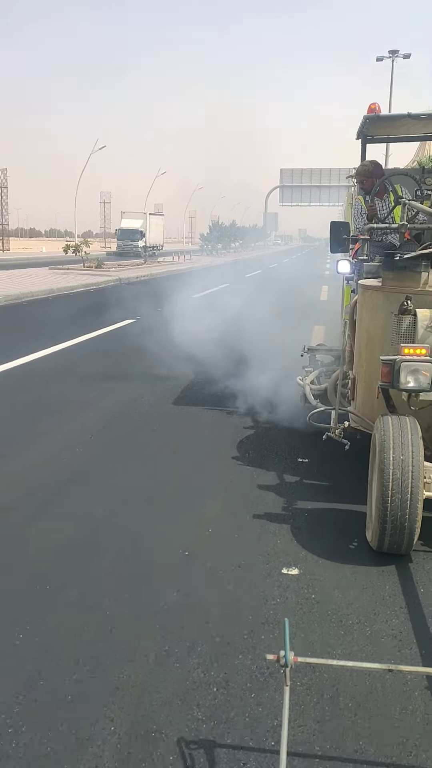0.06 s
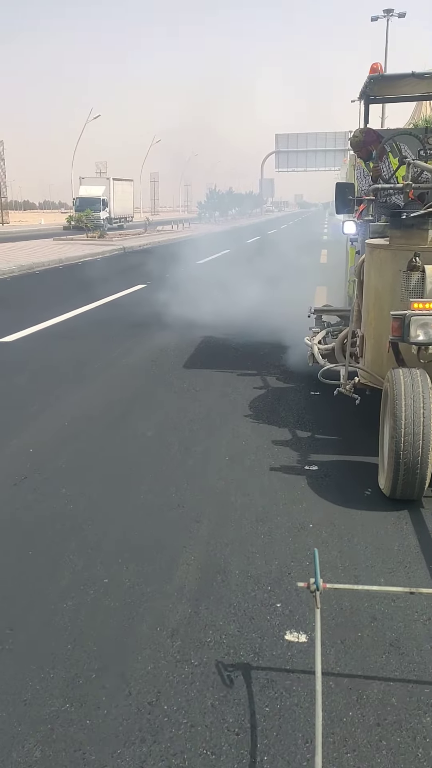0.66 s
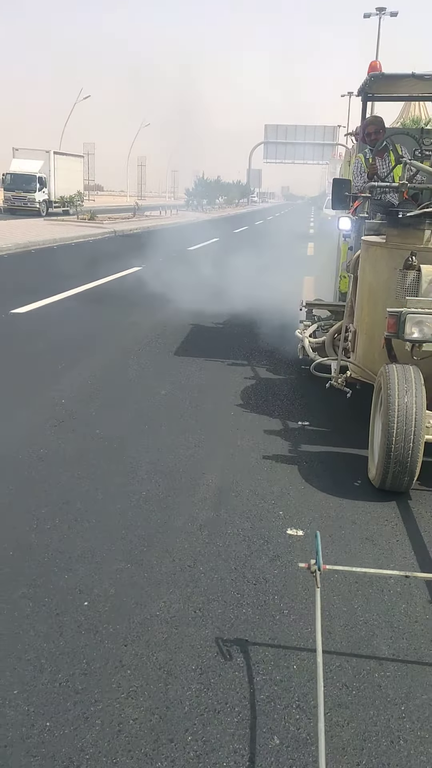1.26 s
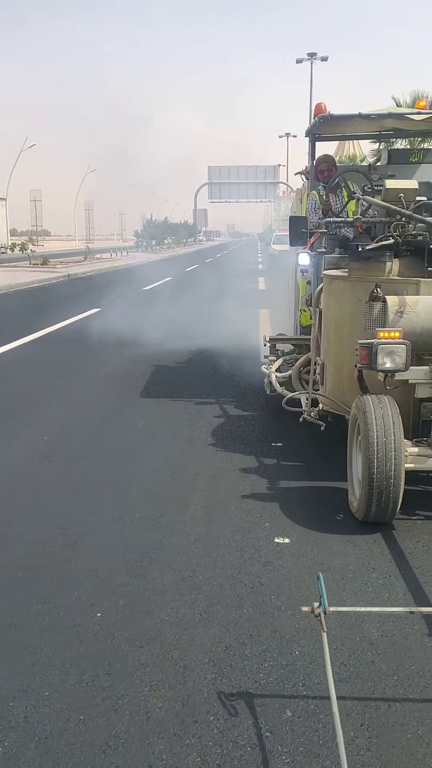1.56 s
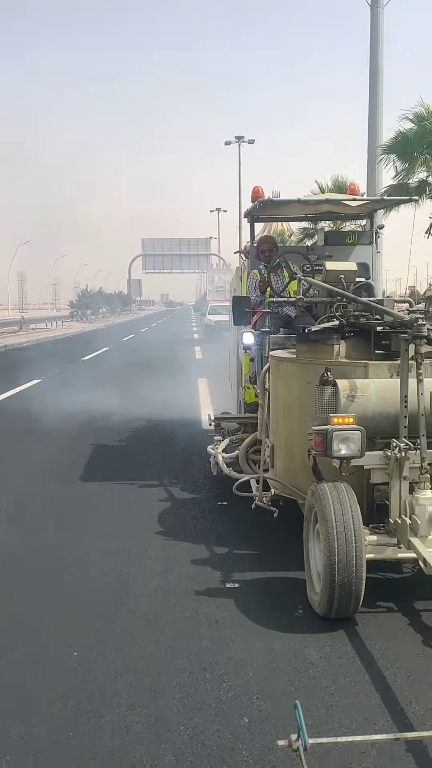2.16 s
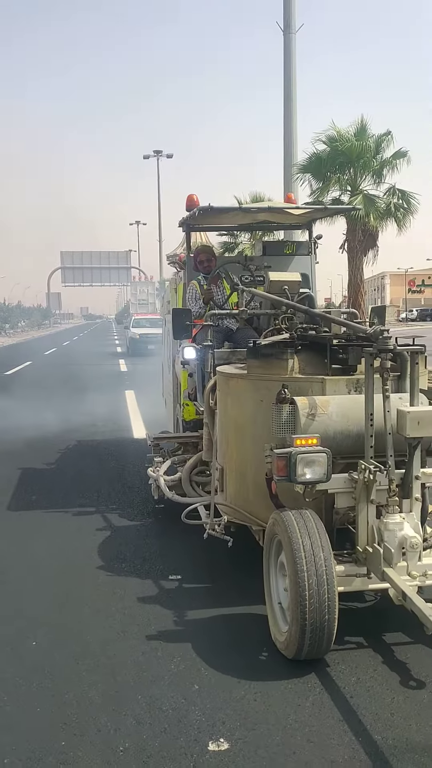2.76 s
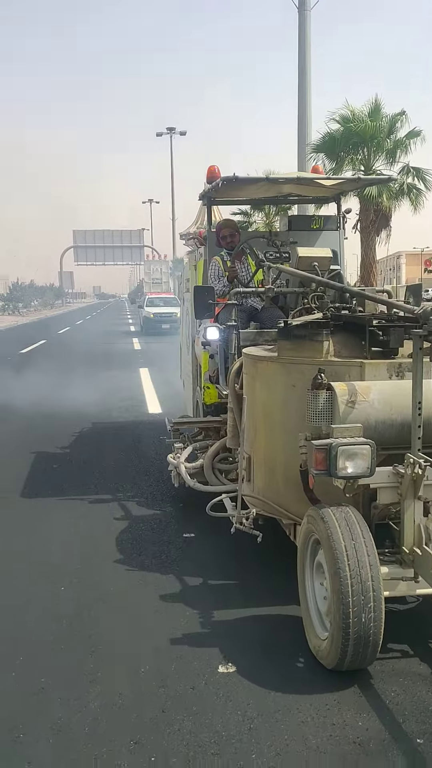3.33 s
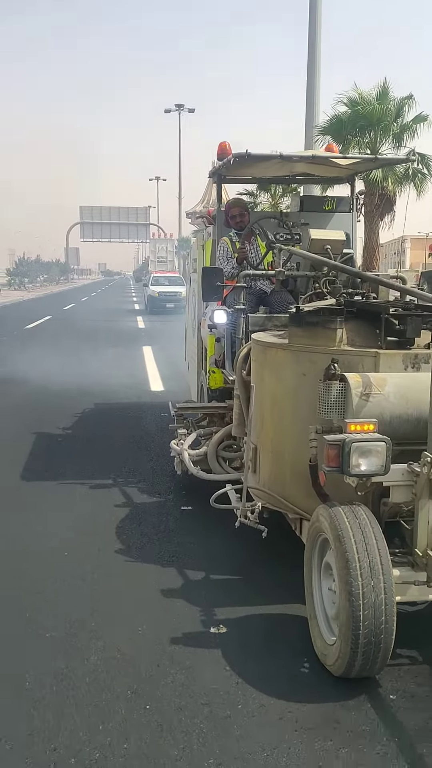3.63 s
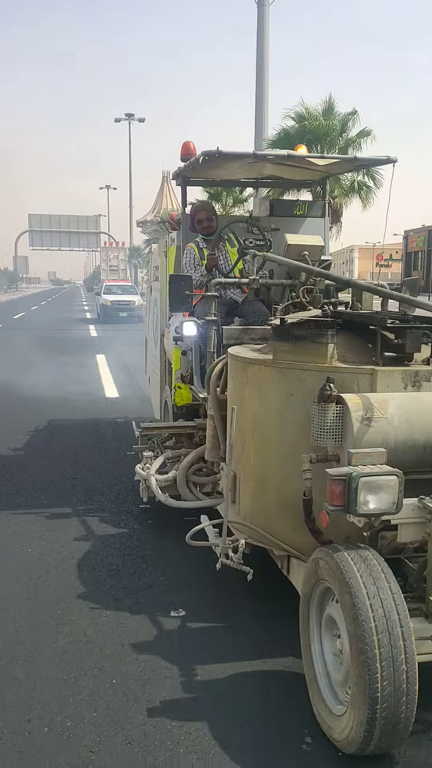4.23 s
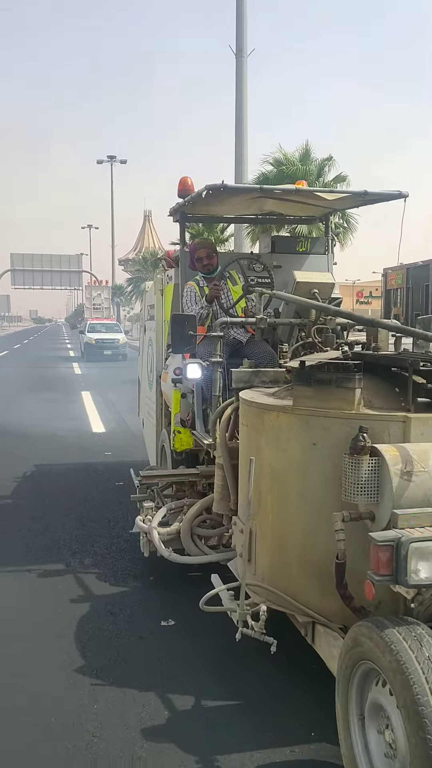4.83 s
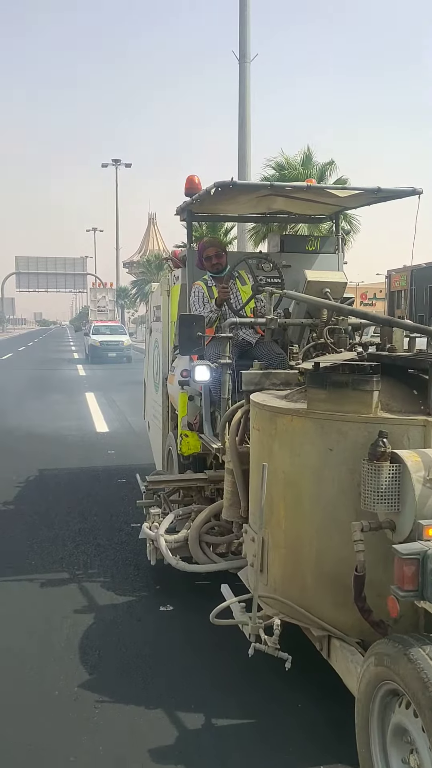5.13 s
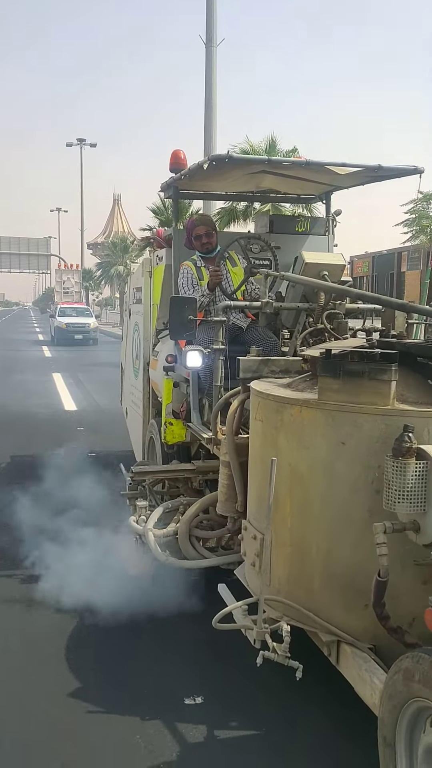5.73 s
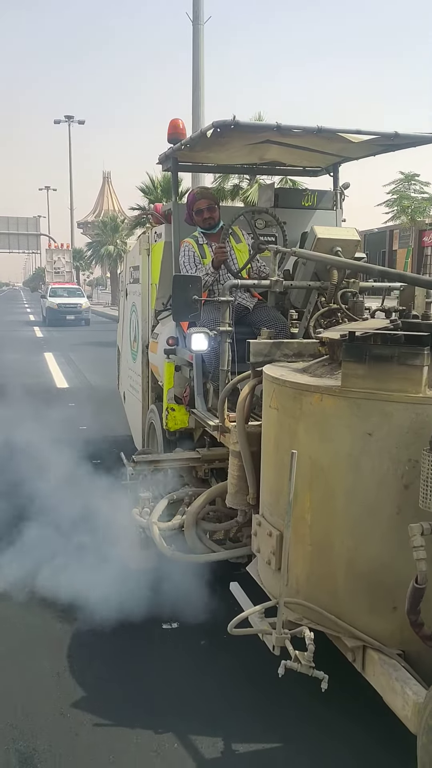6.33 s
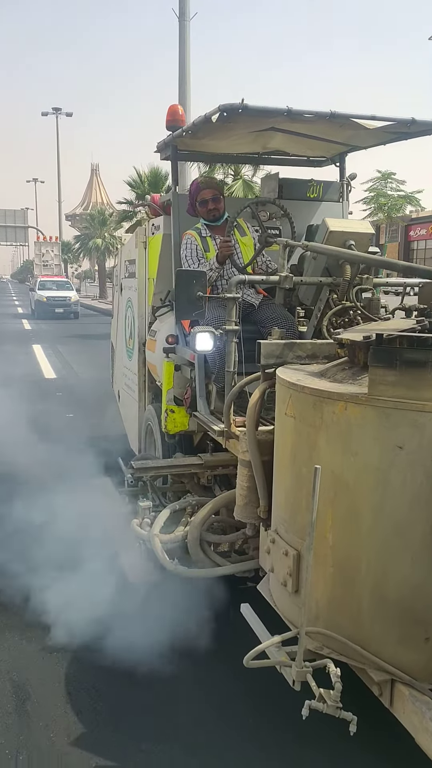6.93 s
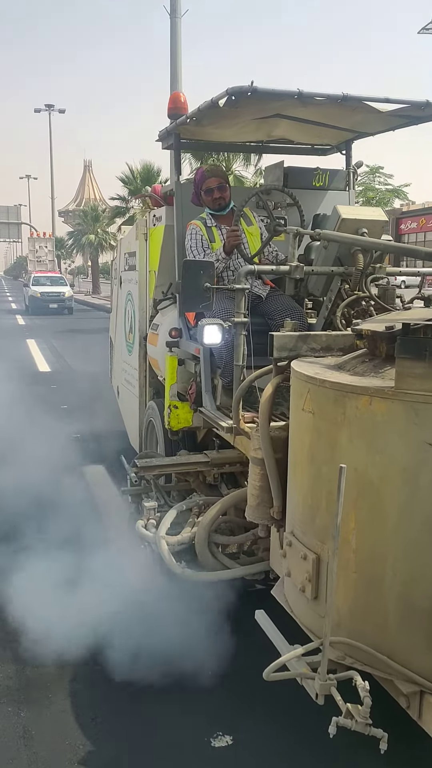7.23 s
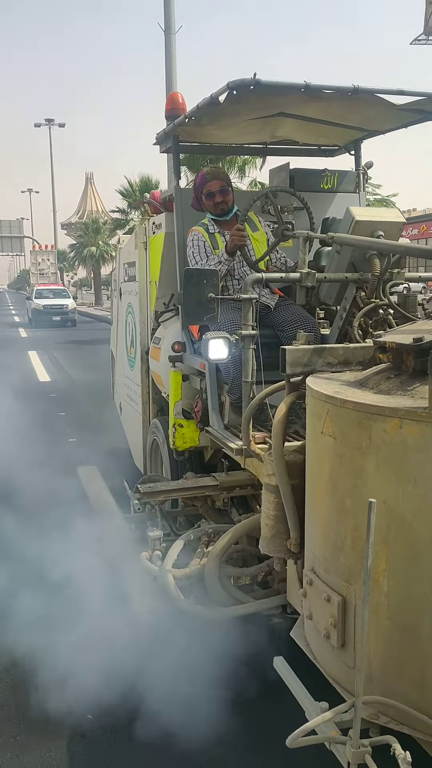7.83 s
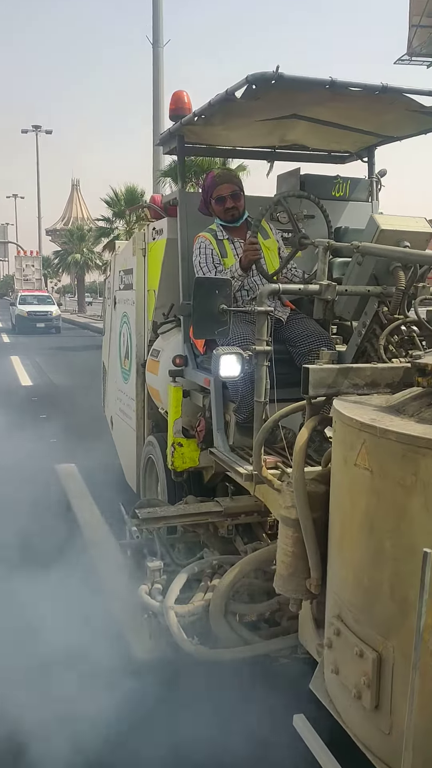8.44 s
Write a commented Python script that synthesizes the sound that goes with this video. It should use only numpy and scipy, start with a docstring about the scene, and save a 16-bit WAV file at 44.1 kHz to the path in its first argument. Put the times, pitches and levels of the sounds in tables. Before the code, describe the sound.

Outdoors on a highway, a nearby diesel line-painting machine drones steadily with a thin hiss of compressed air. A few gusts thump the microphone, a faint whine rises and falls, and a vehicle's tyres rush by. A little past halfway, a much louder jet of paint spits open and keeps spraying, with a low roar, uneven splatter and bright, slightly hollow hiss over the engine.

```python
"""A road-marking machine crawls along a highway, heard from a phone carried just ahead of it.
From the start its diesel throbs, its drives hum and leaking air hisses over a wash of distant tyres.
From about 2 s wind bumps the microphone and a thin whine comes and goes; near 4 s traffic swells by.
At 5.2 s the spray gun opens with a spit of stored pressure, then blasts paint at the asphalt: the jet
roars, splatters, hisses and rings the cavities around it, coming slowly closer as the leak fades."""
import sys
import numpy as np
from scipy import signal
from scipy.fft import rfft, irfft, next_fast_len
from scipy.io import wavfile
from scipy.ndimage import uniform_filter1d, map_coordinates

SR = 44100
rng = np.random.default_rng(int(sys.argv[2]) if len(sys.argv) > 2 else 0)


def persist_wave(psi):
    """Save psi, clipped to +-1, as 16-bit WAV."""
    counts = np.round(np.clip(psi, -1, 1) * 32767).astype(np.int16)
    wavfile.write(sys.argv[1], SR, np.atleast_2d(counts).T)


N = 378819
T = np.arange(N) / SR
FREQS = np.fft.rfftfreq(N, 1 / SR)

# partials of the exhaust note: firing_multiple, far_level_db, near_level_db
EXHAUST_PARTIALS = [(1, -33.5, -31), (1.42, -44, -53), (2, -37.5, -32.5), (3, -36.5, -42.5),
                    (3.5, -46.5, -41.5), (4, -41.5, -52)]
# the diesel sags under load: centre_s, half_length_s, firing_change_hz
LOAD_SAGS = [(.65, 0.636, -0.729), (7.45, .45, -1.0)]
# rumble of engine block and chassis: frequency_hz, gain_db
RUMBLE_EQ = [(24, -3), (48, -4.5), (75, -7), (110, -5.5), (160, -1.5), (205, -10), (290, -13), (480, -19),
             (550, -25), (660, -27), (980, -24.5), (1350, -40.5), (2000, -34), (3000, -37)]
# pump and compressor hum: pitch_hz, level_db, loudest_s, half_length_s
DRIVE_HUMS = [(222.3, -35, 6.5, 1.5), (252.6, -36, 6.0, 1.26), (383.3, -48.5, -1, 2.7),
              (497, -51.5, 0.9, 2)]
# escaping air: frequency_hz, far_gain_db, near_gain_db
LEAK_EQ = [(1510, -28.5, -15), (2020, -0.5, -10), (2500, -18, -29.5), (2750, -17, -10.5), (3050, -21, -16),
           (3220, -13, -9.5), (3890, -11.5, -8), (3940, -25, -14), (4350, -18.5, -19.5), (4970, 0, -4),
           (5200, 3.5, -4), (5420, 1.5, -7), (5780, 0, 1.5), (6250, -8.5, -7.5), (6800, -14.5, -13.5),
           (7280, -3, -7.5), (7800, -12, -17.5)]
# the leak dips and swirls as the phone swings: centre_s, half_length_s, gain_db, lag_change_ms
PHONE_SWINGS = [(0.733, 0.11, -3.5, -.05), (0.993, 0.09, -1.5, -0.017), (1.196, 0.1, -2.5, -0.086),
                (2.052, 0.1, -2.5, -.005), (2.791, 0.69, -3, .007), (5.047, 0.26, 0.5, 0.071)]
# tyres on the road: frequency_hz, gain_db
TYRE_EQ = [(150, -18), (260, 0.5), (420, -0.5), (650, -2), (900, -1.5), (1100, -5.5), (1350, -16),
           (1800, -14), (2500, -29.5), (4000, -24.5), (7000, -57)]
# traffic going by: loudest_s, half_length_s, level_db
TRAFFIC_PASSES = [(0.098, 0.39, -45.5), (3.76, 0.26, -32.5), (3.962, .04, -36.5), (4.253, 0.17, -33)]
# wind on the microphone ports: centre_s, half_length_s, level_db, left_minus_right_db
WIND_GUSTS = [(1.887, 0.1, -31.5, 8), (2.018, 0.027, -22.5, 1), (2.095, 0.022, -22, -2),
              (2.206, 0.11, -24.5, -4), (2.868, 0.038, -24, 5), (3.957, 0.032, -24, 1),
              (4.33, 0.089, -32, 5), (4.499, 0.025, -20.5, -9)]
# the whine comes forward: centre_s, half_length_s, gain_db
WHINE_RISES = [(2.15, .3, 6), (3.25, .45, 11.5), (4.98, .33, 11)]
# stored pressure spits out, at full strength: centre_s, half_length_s, gain_db
PRESSURE_SPITS = [(5.2435, .0045, 6), (5.2575, .0058, 8.2)]
# low body of the jet: frequency_hz, gain_db
ROAR_EQ = [(90, -30.5), (150, -4), (230, 0), (280, -2.5), (335, 4.5), (370, 0.5), (440, 2.5), (490, -6.5),
           (540, -3), (620, -16), (900, -48)]
# paint hitting asphalt: frequency_hz, far_gain_db, near_gain_db
SPLATTER_EQ = [(447, -20.5, -17), (580, -6, -7.5), (710, -1, -4), (776, 0, -6), (865, -1.5, 0.5),
               (1020, 5, -5), (1080, -7, -7), (1156, 2, -5.5), (1290, -16, -9.5), (1500, -13, -9),
               (1680, -6.5, -21), (1765, 1.5, -10.5), (2030, -9.5, -7), (3050, -24, -33)]
# bright top of the jet: frequency_hz, far_gain_db, near_gain_db
HISS_EQ = [(2000, -15.5, -12.5), (2460, -6, -2.5), (2900, -7, -13.5), (3240, -5.5, -4.5),
           (4020, -3.5, -4.5), (4460, -3.5, -4), (4630, -0.5, -4), (5230, 0.5, -5), (5800, -5.5, 0),
           (5830, 1.5, -1.5), (6400, -2.5, -9), (6940, -3.5, -1.5), (7440, -3, -4), (8200, -28, -23)]
# the nozzle's hiss swells and sags: centre_s, half_length_s, gain_db
HISS_SWELLS = [(5.3, 0.043, 3), (6.03, 0.14, 2.5), (6.66, 0.2, 3.5), (7.18, 0.071, 0), (7.69, 0.049, -1),
               (8.45, 0.53, 5)]
# hollows around the nozzle:
# pitch_hz, bandwidth_hz, far_level_db, near_level_db, change_s, left_minus_right_db
NOZZLE_CAVITIES = [(695, 65, -35, -36.5, 5.7, -9.5), (992, 48, -34.5, -40.5, 6.8, 6.5),
                   (1855, 210, -35.5, -43.5, 6.04, 8.5), (2237, 160, -53, -36, 6, -3),
                   (4200, 430, -60.5, -28, 7.85, 6.5), (5050, 130, -33.5, -48, 5.1, 14.5)]
# the two microphone ports hear differently: frequency_hz, left_minus_right_db
PORT_BALANCE = [(150, -1.5), (450, 1.5), (640, -6), (850, -2.5), (1100, 3.5), (1450, -3), (2000, 7.5),
                (2700, -1.5), (3700, 0), (5000, 3), (6000, -0.5), (6700, -4), (7300, -9), (8000, -13.5)]

FIRING_HZ, RUMBLE_DB = 43.25, -32  # the diesel's governed firing rate, and its block's level
LEAK_DB, LEAK_LAG_MS, LEAK_SAG_DB_PER_S = -36, -0.17, 4.3
BOB_FIRST_S, BOB_PERIOD_S, BOB_BEND, BOB_FADE_S = .44, .49, .03, 1.7
ROAD_DB = -46
WHINE_HZ, WHINE_DB = 598, -51
OPEN_S, ATTACK_S = 5.2405, .003  # the spray valve opens
SETTLE_S, SETTLE_DB = 0.039, 2  # the surplus left in the hose bleeds away
EMERGE_S, EMERGE_HALF_S = 7.8, 0.25  # the nozzle comes out from behind the tank
ROAR_DB, ROAR_NEAR_BOOST_DB, SPLATTER_DB, HISS_DB = -23, 3.5, -24.5, -28.5


def undb(db):
    """Decibels to gain."""
    return 10 ** (np.asarray(db) / 20)


def unit(x):
    """Scale to an rms of one."""
    return x / np.sqrt(np.mean(x ** 2))


def bells(events):
    """Sum of smooth bumps, from rows of centre_s, half_length_s, height."""
    return sum(height * np.exp(-.5 * ((T - s) / half_s) ** 2) for s, half_s, height in events)


def walk(rate_hz):
    """Smooth random wander with a spread near one."""
    step = max(int(SR / rate_hz), 2)
    return uniform_filter1d(np.repeat(rng.standard_normal(N // step + 1), step), step)[:N]


def passing(closest_s, half_s):
    """Gain of a source that moves by in a straight line: one over its distance."""
    return 1 / np.hypot(1, (T - closest_s) / half_s)


def colour(x, points):
    """EQ through points of frequency_hz, gain_db; both ends roll off."""
    hz, db = np.transpose(points)
    size = next_fast_len(N)
    f = np.maximum(np.fft.rfftfreq(size, 1 / SR), 1)
    gain = undb(np.interp(np.log(f), np.log(hz), db))
    roll_off = np.minimum(f / hz[0], 1) ** 2 * np.minimum(hz[-1] / f, 1) ** 2
    return irfft(rfft(x, size) * gain * roll_off, size)[..., :N]


def approach(x, eq, far_s, near_s):
    """Crossfade from the far EQ to the near one, each at an rms of one."""
    hz, far_db, near_db = np.transpose(eq)
    near = np.clip((T - far_s) / (near_s - far_s), 0, 1)
    return (1 - near) * unit(colour(x, np.c_[hz, far_db])) + near * unit(colour(x, np.c_[hz, near_db]))


def delay(x, ms):
    """Read a sound a moving number of milliseconds late."""
    return map_coordinates(x, [np.arange(N) - ms * SR / 1000], order=3, mode="mirror")


def turbulence(likeness, lag_ms=0):
    """Stereo noise: a direct share that reaches the right port lag_ms later, and a diffuse rest."""
    direct = rng.standard_normal(N)
    late = delay(direct, lag_ms) if np.any(lag_ms) else direct
    diffuse = rng.standard_normal((2, N))
    return np.sqrt(likeness) * np.array([direct, late]) + np.sqrt(1 - likeness) * diffuse


def reflections(x, strength, span_ms, sway, count=6):
    """Short echoes off tank and road; their paths change as the phone sways, shifting the hollow tone."""
    out = x.copy()
    for path_ms, sign in zip(rng.uniform(0.1988, 1, count) * span_ms, rng.choice([-1, 1], count)):
        late_ms = path_ms * (1 + sway * walk(2))
        for port in range(2):
            late_s = (late_ms + rng.uniform(-.03, .03)) / 1000
            out[port] += sign * strength * np.interp(T - late_s, T, x[port])
    return out


def shaft_tone(hz, db, waver_db):
    """The note of a turning shaft, wavering a little in pitch and level."""
    phase = 2 * np.pi * np.cumsum(hz * (1 + 0.001806 * walk(7))) / SR
    return np.sqrt(2) * undb(db + waver_db * walk(4)) * np.sin(phase)


def diesel():
    """Firings give a throbbing exhaust note and shake the block in time with it."""
    firing_hz = (FIRING_HZ + bells(LOAD_SAGS)) * (1 + 0.00403 * walk(9))
    phase = 2 * np.pi * np.cumsum(firing_hz) / SR
    exhaust = 0
    for multiple, far_db, near_db in EXHAUST_PARTIALS:
        db = np.interp(T, [0, T[-1]], [far_db, near_db]) + walk(13)
        smear = 0.29 * multiple ** 2  # the silencer smears each pulse a little
        exhaust -= np.sqrt(2) * undb(db) * np.cos(multiple * phase - smear)
    knocks = turbulence(likeness=0.89) * undb(2 * np.cos(phase) + .5 * np.cos(phase / 2))
    return exhaust + unit(colour(knocks, RUMBLE_EQ)) * undb(RUMBLE_DB)


def drives():
    """Pump and compressor hum, loudest as each drive faces the phone."""
    return sum(shaft_tone(hz, db, waver_db=2) * passing(loudest_s, half_s)
               for hz, db, loudest_s, half_s in DRIVE_HUMS)


def air_leak():
    """A thin hiss of compressed air from the right; it swirls as its lag between the ports changes."""
    centre_s, half_s, dip_db, shift_ms = np.transpose(PHONE_SWINGS)
    air = turbulence(likeness=0.59, lag_ms=LEAK_LAG_MS + bells(zip(centre_s, half_s, shift_ms)))
    air = reflections(air, strength=.18, span_ms=3, sway=.1)
    air = approach(air, LEAK_EQ, far_s=0.74, near_s=3.2)
    # the pitch bends up and down while the phone bobs
    bend = BOB_BEND * np.cos(2 * np.pi * (T - BOB_FIRST_S) / BOB_PERIOD_S)
    bend *= np.exp(-(T / BOB_FADE_S) ** 2)
    air = np.array([delay(port, -1000 * np.cumsum(bend) / SR) for port in air])
    swing_db = bells(zip(centre_s, half_s, dip_db))
    sag_db = LEAK_SAG_DB_PER_S * np.maximum(T - OPEN_S, 0)  # it weakens once the gun draws air
    return air * undb(LEAK_DB + swing_db - sag_db + 0.27 * walk(25))


def traffic():
    """Tyre roar swells and fades over the bed of the distant road."""
    pass_power = sum((undb(db) * passing(s, half_s)) ** 2 for s, half_s, db in TRAFFIC_PASSES)
    swell = np.sqrt(undb(ROAD_DB) ** 2 + pass_power)
    tyres = unit(colour(turbulence(likeness=0.71), TYRE_EQ))
    return tyres * swell * undb(0.74 * walk(19))


def wind():
    """Short eddies thump on each port."""
    gusts = bells((s, half_s, undb(db + np.array([[pan_db], [-pan_db]]) / 2))
                  for s, half_s, db, pan_db in WIND_GUSTS)
    thump_eq = [(18, 1), (45, -4.5), (140, -7.5), (260, -15.5), (600, -35.5)]
    return gusts * unit(colour(turbulence(likeness=0.21), thump_eq))


def whine():
    """A thin shaft whine rises out of the machine's drone three times."""
    return shaft_tone(WHINE_HZ, WHINE_DB + bells(WHINE_RISES), waver_db=2.1)


def valve(spit):
    """Envelope of the spray: it snaps open, spits as hard as asked, then settles to a steady flow."""
    since_s = T - OPEN_S
    attack = np.exp(np.minimum(since_s, 0) / ATTACK_S)
    surplus = np.exp(-np.maximum(since_s, 0) / SETTLE_S)
    return attack * undb(spit * bells(PRESSURE_SPITS) + SETTLE_DB * surplus)


def spray_gun():
    """The jet roars, paint splatters unevenly on the road and the nozzle hisses."""
    near = .5 + .5 * np.tanh((T - EMERGE_S) / EMERGE_HALF_S)
    lag_ms = 0.082 + 0.034 * near  # the nozzle drifts to the left
    sputter = undb(1.02 * walk(220) + 0.73 * walk(30))  # clots of paint break the flow
    fizz = undb(2.1 * walk(500))  # the fine mist tears off faster still

    roar = colour(turbulence(likeness=0.98) * sputter, ROAR_EQ)
    roar = unit(roar) * undb(ROAR_DB + ROAR_NEAR_BOOST_DB * near)

    splatter = turbulence(likeness=0.93, lag_ms=1.48 * lag_ms) * sputter
    splatter = reflections(splatter, strength=.16, span_ms=14, sway=0.021)
    splatter = approach(splatter, SPLATTER_EQ, far_s=5.1, near_s=7.6) * undb(SPLATTER_DB)

    hiss = turbulence(likeness=0.71, lag_ms=lag_ms) * sputter * fizz
    hiss = reflections(hiss, strength=.23, span_ms=4.5, sway=.07)
    hiss = approach(hiss, HISS_EQ, far_s=7.2, near_s=7.3) * undb(HISS_DB + bells(HISS_SWELLS))
    return roar * valve(spit=.2) + splatter * valve(spit=1.1) + hiss * valve(spit=.9)


def nozzle_rings():
    """The blast rings cavities around the gun; which ones carry changes as the machine closes in."""
    rings = 0
    for hz, width_hz, far_db, near_db, change_s, pan_db in NOZZLE_CAVITIES:
        blast = turbulence(likeness=0.83, lag_ms=0.065)
        ring = signal.lfilter(*signal.iirpeak(hz, hz / width_hz, fs=SR), blast)
        near = .5 + .5 * np.tanh((T - change_s) / 0.24)
        db = far_db + near * (near_db - far_db) + 0.8 * walk(1.933)
        rings += unit(ring) * undb(db + np.array([[pan_db], [-pan_db]]) / 2)
    return rings * valve(spit=1)


def scene():
    """The bed of machine and road, then wind and whine, then the spray on top."""
    return diesel() + drives() + air_leak() + traffic() + wind() + whine() + spray_gun() + nozzle_rings()


def record(dry):
    """Each port of the phone has its own colour; the top is cut steeply."""
    cavity_hz, width_hz, top_hz = 610, 85, 7800
    hz, db = np.transpose(PORT_BALANCE)
    balance_db = np.interp(FREQS, hz, db)
    gains = undb(np.array([balance_db, -balance_db]) / 2)
    gains /= np.sqrt(np.mean(gains ** 2, axis=0))
    # the right port's cavity delays the notes that ring it
    phase_lag = 0.86 * np.exp(-((FREQS - cavity_hz) / width_hz) ** 2)
    ports = gains * np.exp(-1j * np.outer([0, 1], phase_lag))
    heard = irfft(rfft(dry) * ports, N)
    return signal.sosfilt(signal.ellip(10, .2, 80, top_hz, fs=SR, output="sos"), heard)


dry = scene()
out = record(dry)
persist_wave(out)
```